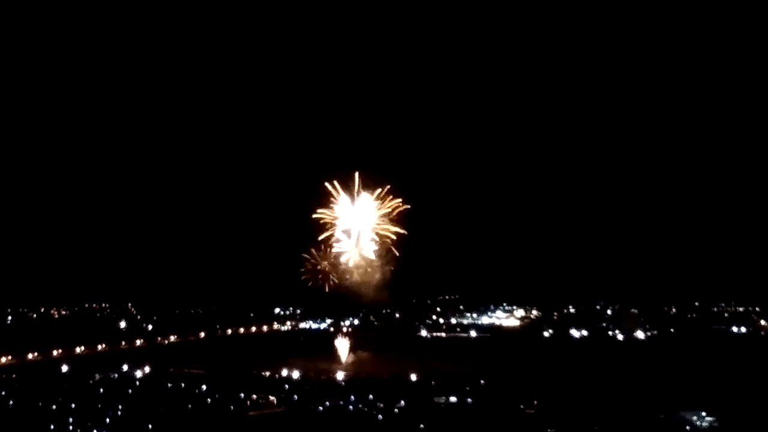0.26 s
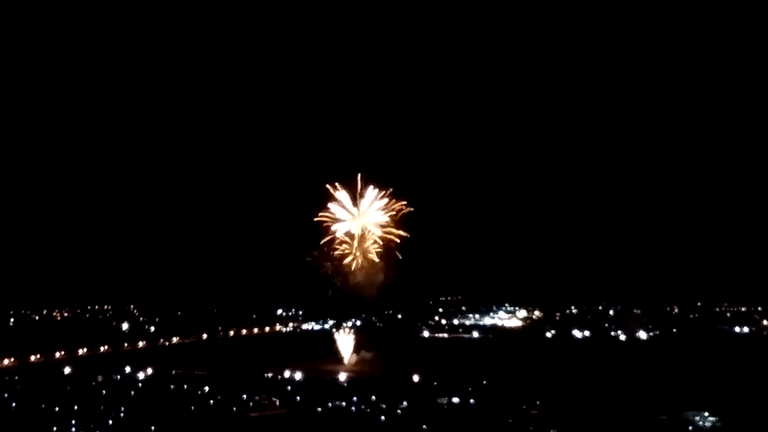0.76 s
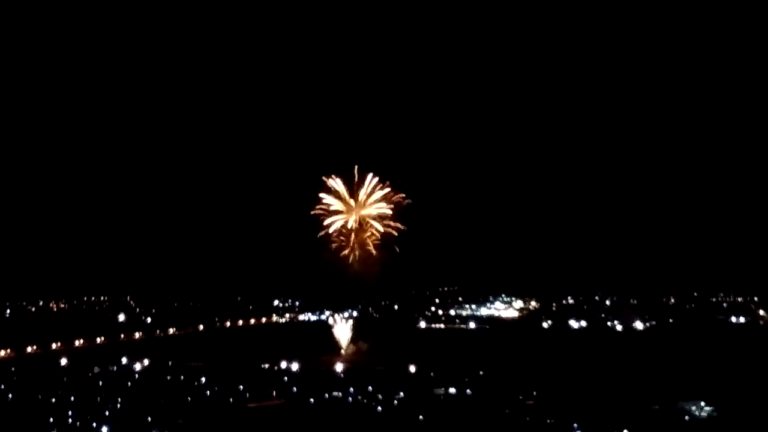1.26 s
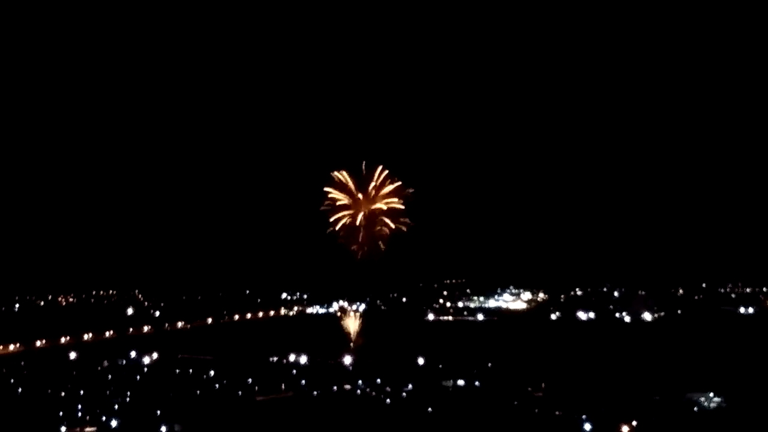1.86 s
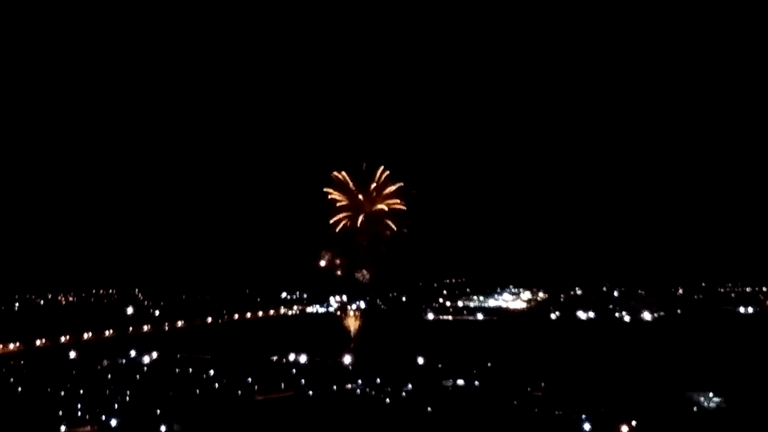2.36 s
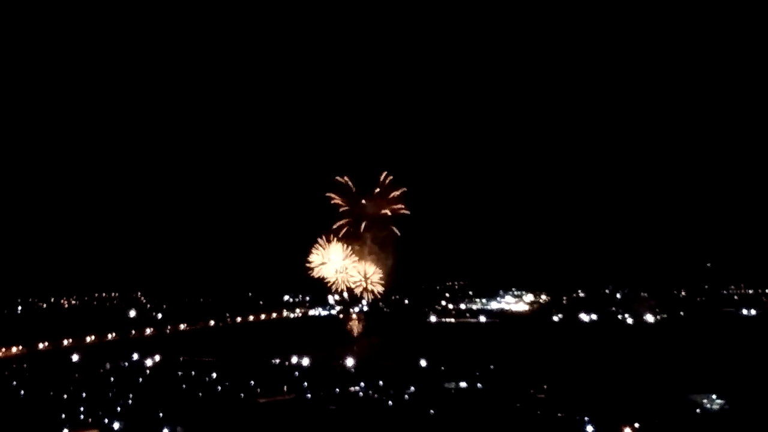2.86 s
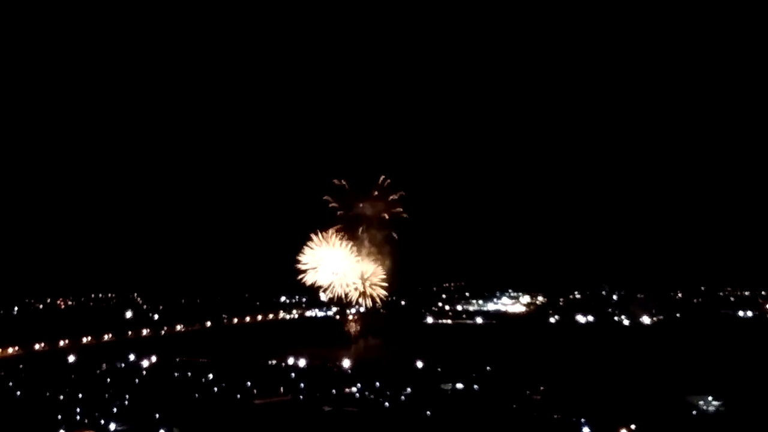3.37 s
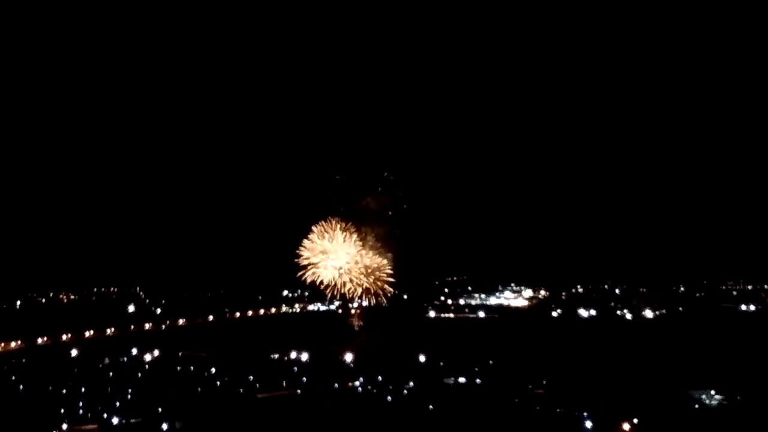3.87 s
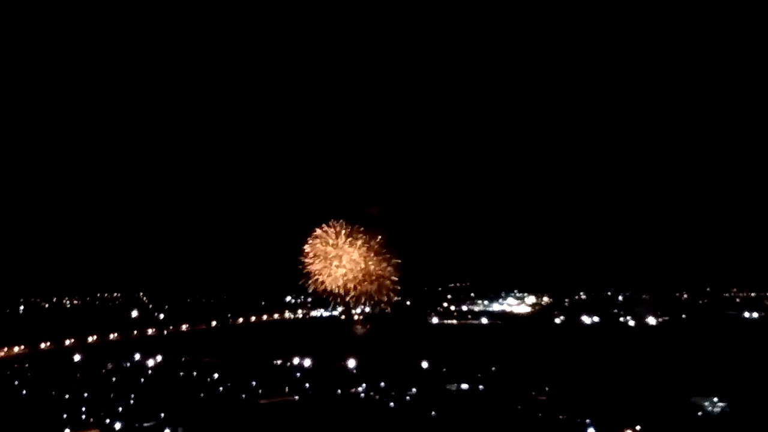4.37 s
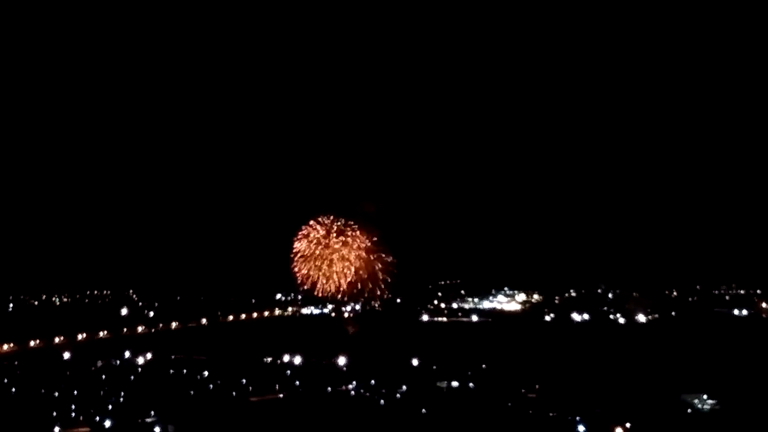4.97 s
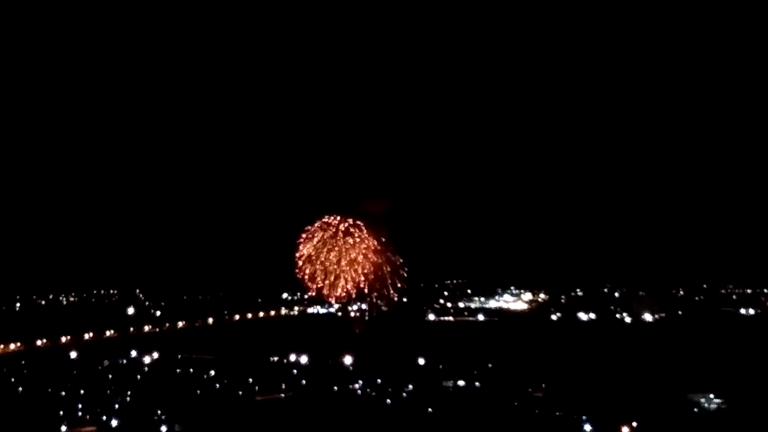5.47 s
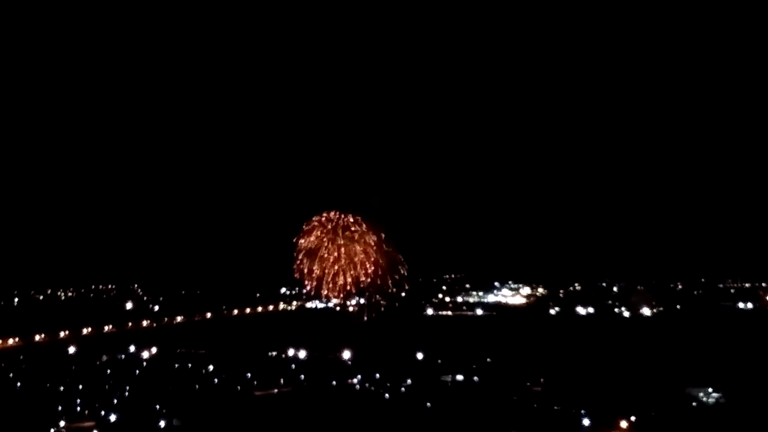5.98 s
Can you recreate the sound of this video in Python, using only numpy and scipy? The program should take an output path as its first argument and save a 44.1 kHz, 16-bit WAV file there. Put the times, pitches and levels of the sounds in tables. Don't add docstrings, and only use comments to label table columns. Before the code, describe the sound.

Distant fireworks boom heavily over a night town, overloading a small microphone and rolling off hills, with faint crickets, handling ticks and passing cars.

```python
import sys
import numpy as np
from scipy import signal
from scipy.fft import rfft, irfft, next_fast_len
from scipy.io import wavfile
from scipy.ndimage import uniform_filter1d, map_coordinates

SR = 44100
rng = np.random.default_rng(int(sys.argv[2]) if len(sys.argv) > 2 else 0)


def makeup_ratio(level_db):
    decades = np.asarray(level_db, float) / 20
    return 10 ** decades


def digitize_waveform(pressure):
    field = np.atleast_2d(pressure).T
    bounded = np.clip(field, -1, 1)
    quanta = np.round(bounded * 32767).astype(np.int16)
    wavfile.write(sys.argv[1], SR, quanta)


N = 274915

# start in seconds, peak in dB, blast length in ms, deep thump in dB,
# delay of the facing wall in seconds.
SHELLS = [
    (0.0641, -4, 1.63, -10.5, 0.088),
    (0.7307, -8.5, 0.79, -10, 0.08),
    (0.8965, -4.5, 1.02, -13, 0.074),
    (2.0191, -1, 1.1, 1, 0.087),
    (2.6958, 1.3, 0.61, 1.5, .069),
    (3.8759, -9.5, 1.08, -29, 0.07),
    (4.2484, 1.3, 0.81, -16.5, 0.08),
]
# start in
# seconds, peak in dB, blast length in ms, deep thump in dB, scatter t60 in seconds.
POPS = [(0.023, -38, 2.9, -44, 0.15), (.4685, -14, 2.25, -13.5, 0.074), (1.202, -16.5, 0.66, -32, 0.14),
        (2.325, -25, 0.44, -41, 0.063), (2.658, -13.5, 0.96, -23, 0.14), (3.1861, -13, 1.1, -5.5, .03),
        (3.66, -33, 0.96, -49, 0.21), (5.224, -25, 0.81, -55, 0.19), (5.818, -25, 0.91, -29, 0.039),
        (5.834, -32, 1.4, -16.5, .05), (5.971, -31.5, 1.4, -41, .25), (6.171, -39, 1.2, -26.5, 0.19)]


def unit(x):
    return x / np.sqrt(np.mean(x ** 2) + 1e-20)


def level_curve(rows, outside=None):
    seconds, level_db = np.transpose(rows)
    return np.interp(np.arange(N) / SR, seconds, level_db, outside, outside)


def wobble(rate):
    coarse = np.arange(0, N + 32, 32)
    knots = rng.standard_normal(int(N * rate / SR) + 4)
    return np.interp(np.arange(N), coarse, map_coordinates(knots, [coarse * rate / SR]))


def filtered(x, response):
    m = next_fast_len(len(x) + 8192)
    return irfft(rfft(x, m) * response(np.fft.rfftfreq(m, 1 / SR)), m)[:len(x)]


def resonance(f, hz, width):
    return 1j * f * width / (hz * hz - f * f + 1j * f * width + 1e-9)


def rush(spectrum, lumps_db, rate, spiky=0., patchy_db=5.5):
    hz_knots, db = np.transpose(spectrum)
    grains = rng.standard_normal(N) * np.exp(spiky * rng.standard_normal(N))
    bins = signal.stft(grains, nperseg=1024)[2]
    patches = uniform_filter1d(rng.standard_normal(bins.shape), size=2, axis=0)
    patches = uniform_filter1d(patches, size=6, axis=1)
    hail = signal.istft(bins * makeup_ratio(patchy_db * unit(patches)), nperseg=1024)[1][:N]
    noise = filtered(hail, lambda f: makeup_ratio(np.interp(np.log(f + 1), np.log(hz_knots + 1), db)))
    return unit(noise * makeup_ratio(lumps_db * wobble(rate)))


def bouts(rows, rest_db, top):
    gain = np.full(3 * N, makeup_ratio(rest_db))
    for s, length, db in rows:
        phase = np.linspace(0, np.pi, round(length * SR))
        gain[round(s * SR):][:len(phase)] += makeup_ratio(db) * np.abs(np.sin(phase)) ** top
    return gain[:N]


def night_air():
    # frequency in Hz, density in dB per Hz.
    air_spectrum = [(15, -15.5), (25, 25), (234, -15), (512, -16.5), (831, -9), (1150, -38), (4670, -41),
                    (5640, -56.5), (15700, -71)]
    return makeup_ratio(-33.5) * rush(air_spectrum, lumps_db=1., rate=4)


def lens_motor():
    # start in seconds, length in seconds, level in dB.
    motor_runs = [
        (2.3, 1.4, -91),
        (4.9, 1.9, -84),
    ]
    steps = np.zeros(N)
    clock = np.arange(SR // 200, N, SR // 100)
    steps[clock] = (rng.random(len(clock)) < .6) * .6 + (np.arange(len(clock)) % 4 == 0)
    ringing = filtered(steps, lambda f: resonance(f, 15100, 1500) ** 2)
    return bouts(motor_runs, -110, top=.4) * unit(ringing)


def cricket_chorus():
    # time in seconds, level in dB.
    chorus_level = [(0.0, -59.5), (1.0, -56), (2.3, -57.5), (3.1, -55), (4.5, -60), (5.0, -52),
                    (5.3, -54.5), (6.23, -53.5)]
    # carrier in Hz, wing pulses per second, level in dB.
    singers = [(5460, 210, -12.5), (5430, 29, -2), (5490, 49, -3.5), (5670, 29, -2), (5730, 31, -3)]
    duck_db, duck_s = -8, .12
    t = np.arange(N) / SR
    trills = np.zeros(N)
    for hz, rate, db in singers:
        swell = makeup_ratio(db + np.clip(4.2 * wobble(3.8), -9, 5))
        pulses = 0.2 + np.sin(2 * np.pi * (rate * t + 0.12 * wobble(23)))
        carrier = np.sin(2 * np.pi * np.cumsum(hz + 25 * wobble(60)) / SR)
        trills += swell * pulses * carrier
    blur = filtered(rng.standard_normal(N),
                    lambda f: resonance(f, 5508, 410) ** 3 + resonance(f, 5700, 240) ** 3)
    duck = sum((t > s) * np.exp(-np.abs(t - s) / duck_s) for s, *_ in SHELLS)
    return makeup_ratio(level_curve(chorus_level) + duck_db * duck) * unit(unit(trills) + 0.45 * unit(blur))


def near_cricket():
    stroke = (np.arange(N) / SR - .0025) * 38.5 % 1 / 38.5
    swell = np.sin(np.pi * np.clip(stroke / .012, 0, 1)) ** 2
    sweep = swell * np.sin(2 * np.pi * (9400 * stroke - 42000 * stroke ** 2))
    return makeup_ratio(-77.5 - 2 + 1.5 * wobble(6)) * unit(sweep)


def katydid():
    # start in seconds, length in seconds, level in dB.
    song_bouts = [(.27, .45, -81), (1.33, .5, -80), (2.5, .5, -85), (3.1, .28, -79), (3.66, .25, -79),
                  (4.05, .4, -81), (4.72, .4, -81), (5.2, .35, -80), (5.5, .9, -84)]
    teeth = 2 * np.pi * np.cumsum(333.5 + 1.1 * wobble(2.5)) / SR
    harmonics = sum(np.cos(k * teeth) for k in range(30, 43))
    rasp = filtered(harmonics, lambda f: resonance(f, 12000, 1200) ** 2)
    hiss = filtered(rng.standard_normal(N), lambda f: resonance(f, 12100, 1700) ** 2)
    return bouts(song_bouts, -83.5, top=.8) * unit(unit(rasp) + .8 * unit(hiss))


def sleeve_rub():
    # start in seconds, length in seconds, rub in dB, low rub over it in dB.
    strokes = [
        (0.994, 0.37, -56.5, 5),
        (1.256, 0.27, -71, 4),
        (1.74, .26, -63.5, 4),
        (2.74, 0.65, -69.5, 0),
        (4.79, 1, -64.5, 9),
        (5.695, 0.7, -66.5, 11.5),
    ]
    # frequency in Hz, density in dB per Hz; the same for the low rub.
    cloth_spectrum = [(3470, -12), (5900, -21.5), (6120, -9), (6840, -6), (8190, -15), (8890, -10),
                      (9410, -12), (9880, -13.5), (10900, -30.5), (12100, -22.5), (13400, -31.5),
                      (15000, -34), (15700, -34)]
    low_cloth_spectrum = [(1820, -30.5), (3100, 4), (3770, -5), (5020, -20.5), (5200, -13.5), (6760, -47.5),
                          (11400, -120)]
    rest_db, rest_low_db, sharpness = -77, -86.5, 1.5
    high_gain = bouts([(s, length, db + 5) for s, length, db, _ in strokes], rest_db + 5, sharpness)
    low_gain = bouts([(s, length, db + low_db) for s, length, db, low_db in strokes], rest_low_db, sharpness)
    rub = high_gain * rush(cloth_spectrum, lumps_db=-1.0, rate=27, spiky=.3, patchy_db=1.2)
    return rub + low_gain * rush(low_cloth_spectrum, lumps_db=0.0, rate=30, spiky=0.3, patchy_db=3.)


def camera_ticks():
    # start in seconds, peak in dB, low mode in dB.
    tick_rows = [(0.4444, -50.5, -9), (0.7566, -47.5, 0), (0.9956, -53.5, 7), (1.0794, -47, -2.5),
                 (1.1524, -52, 9), (1.2234, -54.5, 9), (1.4643, -48, -24), (1.474, -48.5, -8),
                 (1.662, -49.5, -15), (1.843, -67, 18), (1.8664, -49, 10), (1.8837, -55, 13.5),
                 (2.4882, -59, -2), (2.78, -51, -14), (2.7871, -44, -5), (2.911, -45.5, 1.2),
                 (2.9756, -55.5, 4), (3.0792, -33.5, -6.5), (3.097, -29, -15), (3.1443, -47, -4),
                 (3.5743, -53.5, -3.5), (4.8594, -56, 18), (4.8726, -52, 17.5), (4.8887, -50, 12),
                 (4.905, -47.5, 8), (4.9107, -54, 16)]
    # start in seconds, peak in dB, low mode in dB, t60 in seconds, drag in seconds.
    scrapes = [
        (3.076, -35.5, -25, 0.055, 0.0063),
        (3.123, -51.5, -3, 0.061, 0.014),
    ]
    # mode frequency in Hz, width in Hz, level in dB.
    shell_modes = [(7100, 240, -1.5), (6870, 1300, -7), (8870, 370, -16), (12100, 1500, -29)]
    tick_s, contact_s = 0.052, 0.00072
    high, low, t = np.zeros(N + SR), np.zeros(N + SR), np.arange(SR // 8) / SR
    for s, db, low_db, t60, drag in [(*row, tick_s, contact_s) for row in tick_rows] + scrapes:
        snap = rng.standard_normal((2, len(t))) * makeup_ratio(db - 60 * np.maximum(t - drag, 0) / t60)
        high[round(s * SR):][:len(t)] += snap[0]
        low[round(s * SR):][:len(t)] += snap[1] * makeup_ratio(low_db)
    ringing = filtered(high[:N], lambda f: sum(makeup_ratio(db) * resonance(f, hz, width) ** 2
                                               for hz, width, db in shell_modes))
    knock = filtered(low[:N], lambda f: resonance(f, 3810, 1500) ** 2 - 1.4 * resonance(f, 2500, 890) ** 2)
    return makeup_ratio(15) * ringing + makeup_ratio(9.0) * knock


def seam_squeaks():
    # start in seconds, length in seconds, frequency in Hz, level in dB.
    slips = [(1.045, 0.1, 3090, -58), (1.07, .04, 3750, -53), (1.137, 0.05, 1860, -45),
             (1.14, 0.038, 3750, -52), (1.17, 0.055, 2960, -44), (1.203, 0.017, 3250, -45),
             (1.208, 0.03, 3530, -40), (1.16, 0.028, 2410, -54), (1.218, .055, 3700, -47),
             (1.096, 0.057, 4360, -55), (1.216, 0.021, 4170, -43), (1.272, .035, 2900, -51),
             (1.365, 0.087, 1840, -60)]
    squeak = np.zeros(N)
    for s, length, hz, db in slips:
        ring = unit(filtered(rng.standard_normal(SR // 8), lambda f: resonance(f, hz, 110) ** 2))
        ring = ring[-round(length * SR):]
        squeak[round(s * SR):][:len(ring)] += makeup_ratio(db) * np.hanning(len(ring)) * ring
    return squeak


def cars():
    # time in seconds, level in dB; one table for each car.
    first_pass = [(2.9, -58), (3.5, -58.5), (3.9, -53.5), (4.11, -40.5), (4.4, -38.5), (4.74, -32),
                  (5.03, -44.5), (5.3, -46), (6.23, -48.5)]
    second_pass = [(3.0, -69), (3.6, -60.5), (4.3, -48.5), (4.8, -44.5), (5.15, -44), (5.3, -42.5),
                   (5.55, -39), (5.85, -38.5), (6.23, -40)]
    # frequency in Hz, density in dB per Hz; for drone, hiss and roar.
    tread_spectrum = [(620, -12.5), (1050, -6.5), (1260, -5), (1480, 7), (1700, 1.5), (2170, 1), (2400, 3),
                      (3120, -47.5), (5280, -120)]
    tyre_spectrum = [(1120, -33), (1900, -2.5), (2810, 8), (3180, -4.5), (3630, -13), (4700, -44),
                     (4990, -57.5), (5200, -36), (6760, -53.5), (11400, -120)]
    roar_spectrum = [(210, -27), (350, -8), (397, -8), (507, -3.5), (795, -5.5), (901, 1), (1700, -31),
                     (2210, -51), (3740, -120)]
    traffic_db, traffic_hiss_db = -63, -71
    roar_grows, roar_db, drum_db, drone_db = 2.26, -32, -30, -14
    first_db, second_db = level_curve(first_pass, -120), level_curve(second_pass, -120)
    drone_gain = makeup_ratio(first_db) + makeup_ratio(second_db + drone_db) + makeup_ratio(traffic_db)
    drone = drone_gain * rush(tread_spectrum, lumps_db=.8, rate=18, spiky=.4, patchy_db=2.3)
    hiss_gain = makeup_ratio(second_db) + makeup_ratio(traffic_hiss_db)
    hiss = hiss_gain * rush(tyre_spectrum, lumps_db=.8, rate=18, spiky=.4, patchy_db=2.6)
    low = makeup_ratio(roar_db) * rush(roar_spectrum, lumps_db=1.5, rate=25, spiky=.4, patchy_db=2.2)
    bumps = rng.standard_normal(N) * makeup_ratio(4 * wobble(22))
    drumming = filtered(bumps, lambda f: resonance(f, 277, 100) ** 2 + 0.98 * resonance(f, 85, 90) ** 2)
    low += makeup_ratio(drum_db) * unit(drumming)
    roar = makeup_ratio(roar_grows * (second_db - second_db.max())) * low
    surges = makeup_ratio(.9 * np.array([wobble(6), wobble(6), wobble(7)]))
    return surges[0] * drone + surges[1] * hiss + surges[2] * roar


def blasts(rows, over_db, rise, boom_hz, width_hz, top_hz, walls_db, sizzle_db, crack_db):
    # delay in seconds, level in dB.
    near_walls = [(.0072, -12.5), (.0095, -18), (0.018, -15.5), (0.0191, -5.5)]
    (out, deep, fizz, crack), t = np.zeros((4, N + SR)), np.arange(SR // 2) / SR
    for s, db, t60, ms, direct, thump_db in rows:
        here = slice(round(s * SR), round(s * SR) + len(t))
        sparse = rng.standard_normal(len(t)) * (rng.random(len(t)) < .02)
        paths = sparse * 0.69 * makeup_ratio(-60 * t / t60) * (1 - np.exp(-t / rise))
        paths[0] = direct
        for delay, wall_db in near_walls:
            paths[round(delay * SR)] += direct * makeup_ratio(wall_db + walls_db + 0.51 * db)
        u = t[:2048] / (ms / 1000)
        wave = -(1 - u) * np.exp(-u)
        out[here] += makeup_ratio(db + over_db) * signal.fftconvolve(paths, wave)[:len(t)]
        swing = 56 * t + .55 * (1 - np.exp(-t / .014))
        deep[here] += makeup_ratio(thump_db - 60 * t / .17) * np.sin(2 * np.pi * swing)
        fizz[here] += makeup_ratio(db + sizzle_db - 60 * t / 0.21) * rng.standard_normal(len(t))
        crack[here] += direct * makeup_ratio(db + crack_db - 60 * t / 0.16) * rng.standard_normal(len(t))

    def far(f):
        air_loss = 1 / (1 + 1j * f / top_hz) ** 2
        return resonance(f, boom_hz, width_hz) * air_loss * (1 - 0.73 * resonance(f, 491, 280))

    boom = filtered(out[:N], far) + deep[:N]
    boom += filtered(crack[:N], lambda f: resonance(f, 1000, 1300) ** 3)
    return boom + filtered(fizz[:N], lambda f: resonance(f, 2300, 1100) ** 2)


def rolling(near_db, near_s, hill_db, valley_db, valley_s, per_ms_db):
    hill_s, hill_rise_s, hill_fall_s, roll_rise_s = 0.42, 0.097, 0.081, 0.08
    power = np.zeros(N + 3 * SR)
    t = np.arange(3 * SR) / SR
    hill_width = np.where(t < hill_s, hill_rise_s, hill_fall_s)
    hill = makeup_ratio(2 * hill_db) * np.exp(-((t - hill_s) / hill_width) ** 2)
    decay = makeup_ratio(-120 * t / near_s) + makeup_ratio(2 * valley_db - 120 * t / valley_s)
    shape = decay * (1 - np.exp(-(t / roll_rise_s) ** 2))
    bursts = [(s, db, ms, 1) for s, db, ms, *_ in SHELLS]
    bursts += [(s, thump_db - 11.5, ms, 0) for s, _, ms, thump_db, _ in POPS]
    for s, db, ms, high in bursts:
        level_db = near_db + 0.53 * db + per_ms_db * (ms - 1)
        power[round(s * SR):][:len(t)] += makeup_ratio(2 * level_db) * (shape + high * hill)
    return np.sqrt(power[:N])


def town_roll():
    # near level in dB, near t60 in seconds, hill over near in dB, valley over near in dB,
    # valley t60 in seconds.
    roll_layers = [
        (-15.5, 0.8, -13.5, -17, 3.95),
        (-21.5, 1, -5.5, -7.5, 3.98),
        (-30, 1, -6.5, -6.5, 2.2),
        (-40, .8, -20.5, -22.5, 0.75),
        (-40, 0.2, 8, -2, 1.3),
    ]
    layer_per_ms = [4.5, -1.5, -1.5, -14, -1.5]
    # frequency in Hz, density in dB per Hz; for the first three layers.
    rumble_spectrum = [(13, -56), (22, -20.5), (35, 3), (76, 2.5), (129, -8), (195, -8.5), (260, -4.5),
                       (340, -36), (570, -120)]
    body_spectrum = [(94, -13), (160, -1.5), (237, -8), (265, -7), (405, -18), (560, -46.5), (730, -52),
                     (1230, -120)]
    slap_spectrum = [(240, 4), (400, -6), (482, -3), (607, -11.5), (788, 4.5), (896, -2.5), (1350, -20.5),
                     (1600, -25.5), (2080, -16.5), (3520, -120)]
    gains = [rolling(*row, per_ms_db) for row, per_ms_db in zip(roll_layers, layer_per_ms)]
    rumble, body, slap, edge, slope = gains
    lumps = makeup_ratio(1.2 * wobble(14))
    roll = rumble * rush(rumble_spectrum, lumps_db=7.0, rate=11, patchy_db=0.0)
    roll += body * rush(body_spectrum, lumps_db=0.0, rate=50, patchy_db=6.0)
    roll += slap * rush(slap_spectrum, lumps_db=.8, rate=30, spiky=.3, patchy_db=1.8)
    roll += edge * filtered(rng.standard_normal(N), lambda f: 2.7 * resonance(f, 2100, 1300) ** 3)
    uneven = rng.standard_normal(N) * makeup_ratio(1.92 * wobble(25))
    roll += slope * filtered(uneven, lambda f: 7 * resonance(f, 401, 300) ** 3)
    return unit(lumps) * roll


def fireworks():
    # delay in seconds, level under the shell in dB,
    # scatter t60 in seconds, length in ms, direct share 0-1.
    echoes = [
        (.1, -7.5, 0.19, 2.6, 1),
        (0.163, -13.5, 0.25, 2.9, 1),
        (0.305, -13.5, 0.17, 3.6, .2),
        (.35, -6, 0.21, 0.3, 0),
    ]
    near = [(s, db, 0.12, ms, 0.68, thump_db) for s, db, ms, thump_db, _ in SHELLS]
    near += [(s + wall, db - 9.5, 0.062, 0.95 * ms, 0.64, db - 25.5)
             for s, db, ms, _, wall in SHELLS]
    near += [(s, db, t60, ms, 1.02, thump_db) for s, db, ms, thump_db, t60 in POPS]
    late = [(s + delay, db + loss_db, t60, ms, direct, db - 42.5)
            for s, db, *_ in SHELLS for delay, loss_db, t60, ms, direct in echoes]
    hits = blasts(near, over_db=14.5, rise=0.0021, boom_hz=171, width_hz=301, top_hz=1660,
                  walls_db=-0.5, sizzle_db=-28.5, crack_db=-17.5)
    hits += blasts(late, over_db=12, rise=0.019, boom_hz=260, width_hz=238, top_hz=700,
                   walls_db=-24, sizzle_db=-38, crack_db=-25.5)
    return hits + town_roll()


def scene():
    insects = cricket_chorus() + near_cricket() + katydid()
    sleeve = sleeve_rub() + camera_ticks() + seam_squeaks()
    town = night_air() + lens_motor() + insects + sleeve + cars() + fireworks()
    return filtered(town, lambda f: (1j * f / (40 + 1j * f)) ** 4 * (1 - 0.2 * resonance(f, 4540, 550)))[None]


def roll_off(x):
    return signal.sosfilt(signal.butter(12, 16610, fs=SR, output="sos"), x)


def record(dry):
    flat = dry[0] / (1 + np.abs(dry[0] / .35) ** 8) ** (1 / 8)
    cut = filtered(flat - dry[0], lambda f: 1 / (1 + (f / 4500) ** 6))
    heard = filtered(dry[0] + cut, lambda f: np.where(f < 15760, 1, 3e-3))
    return roll_off(heard[None])


dry = scene()
out = record(dry)
digitize_waveform(out)
```